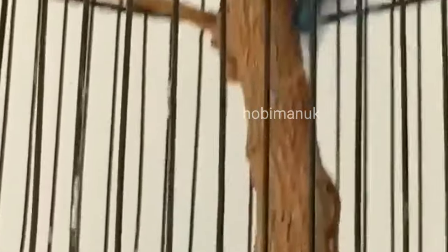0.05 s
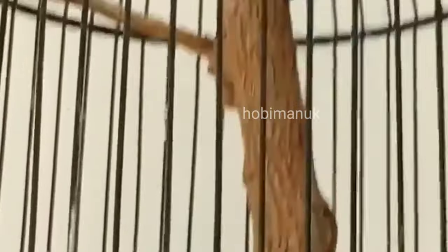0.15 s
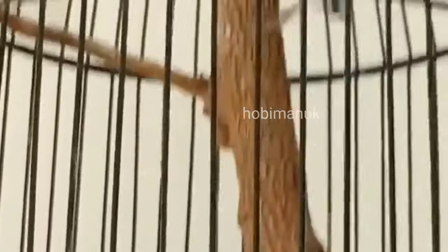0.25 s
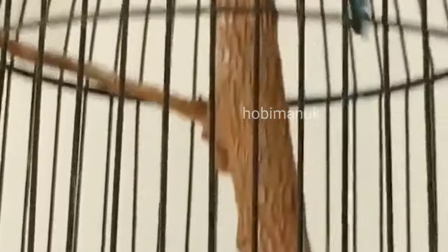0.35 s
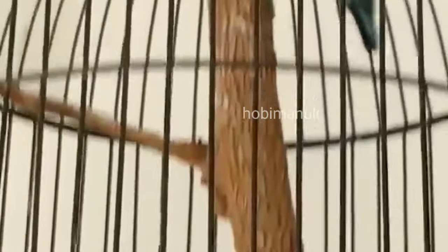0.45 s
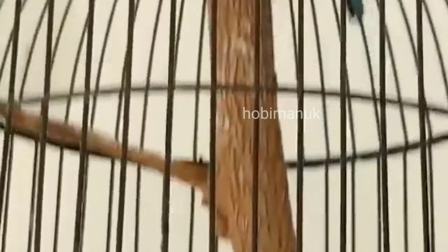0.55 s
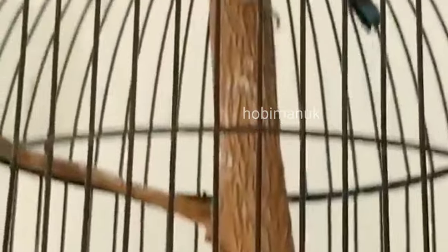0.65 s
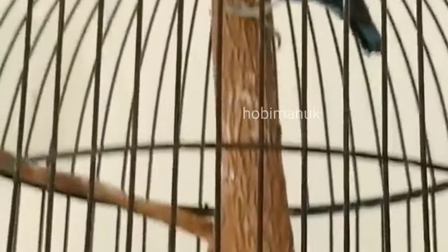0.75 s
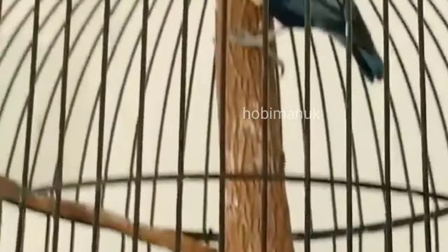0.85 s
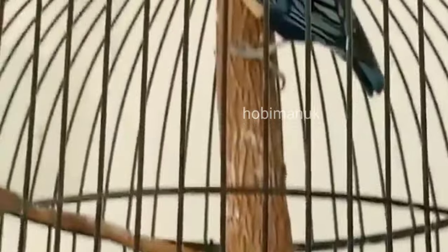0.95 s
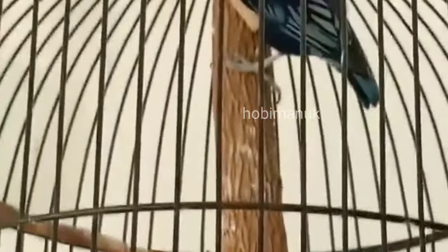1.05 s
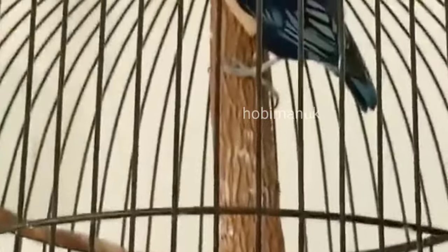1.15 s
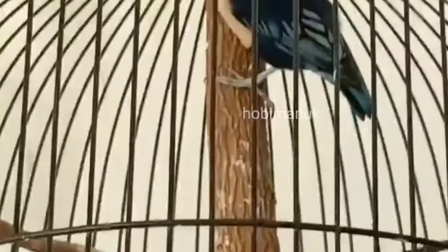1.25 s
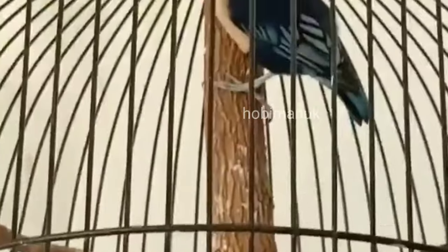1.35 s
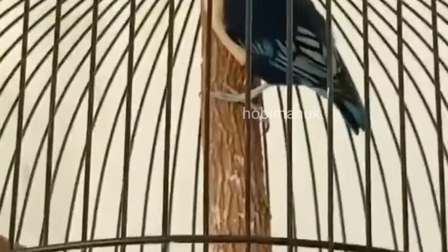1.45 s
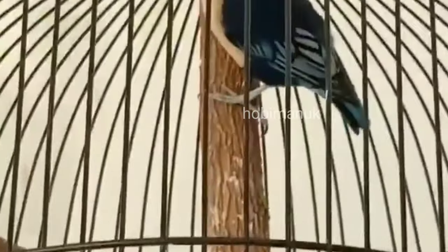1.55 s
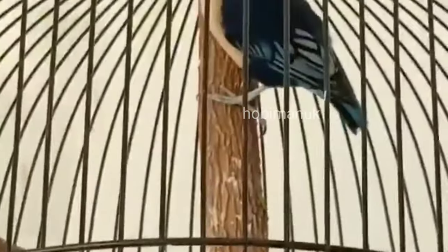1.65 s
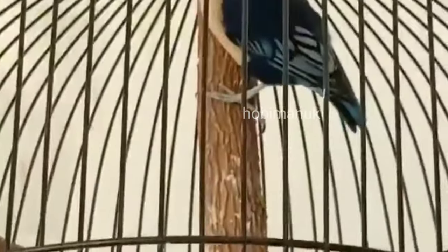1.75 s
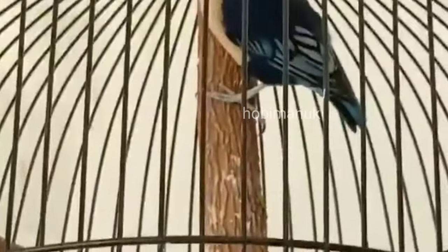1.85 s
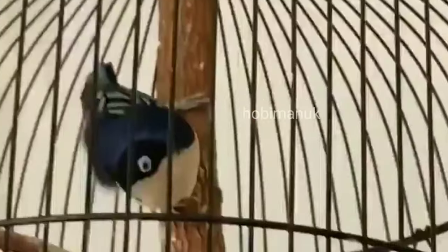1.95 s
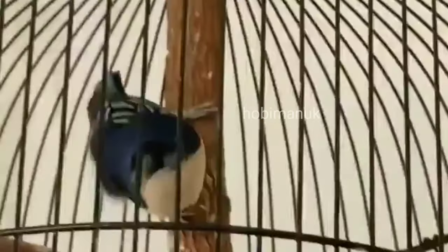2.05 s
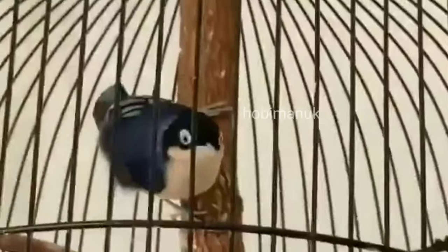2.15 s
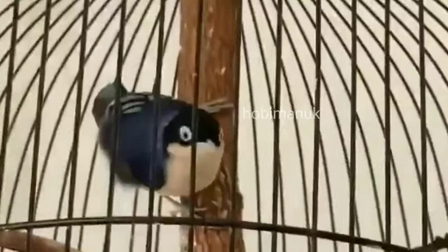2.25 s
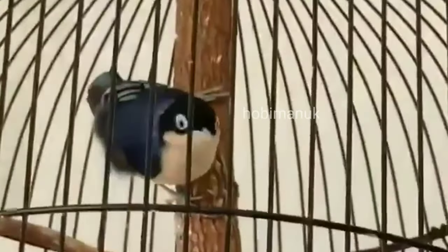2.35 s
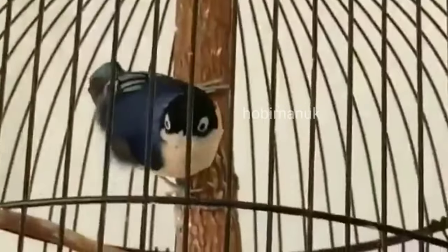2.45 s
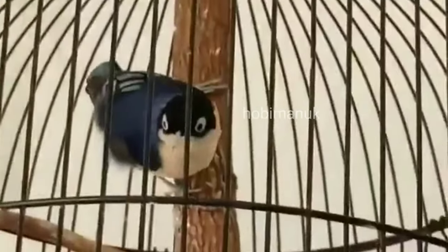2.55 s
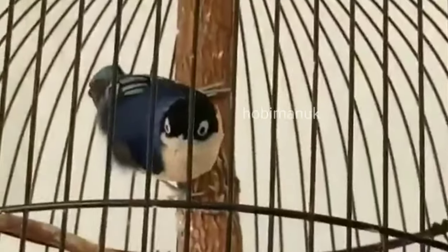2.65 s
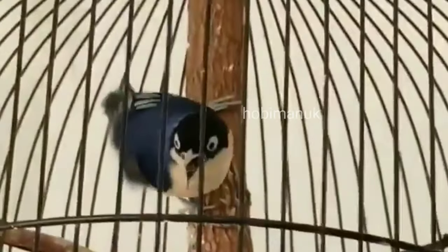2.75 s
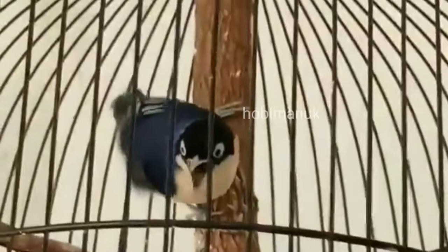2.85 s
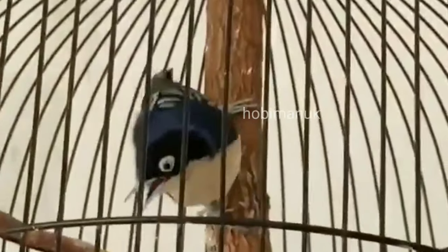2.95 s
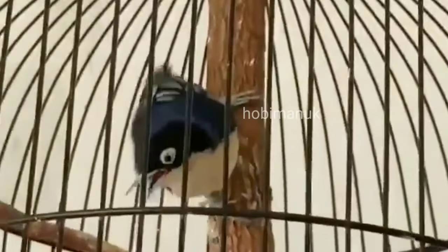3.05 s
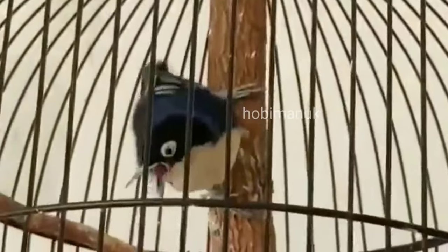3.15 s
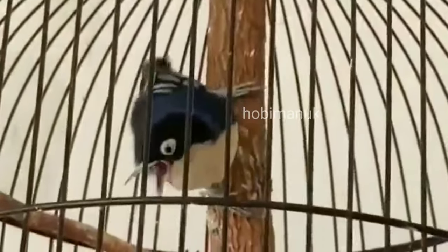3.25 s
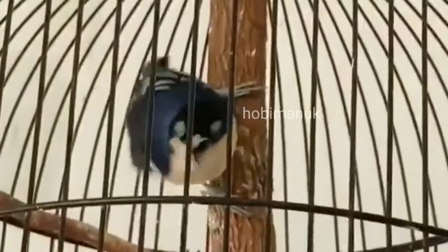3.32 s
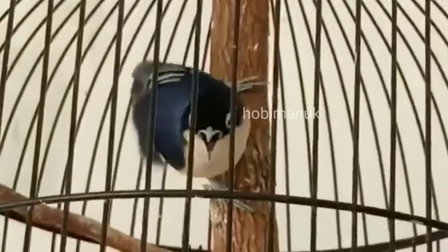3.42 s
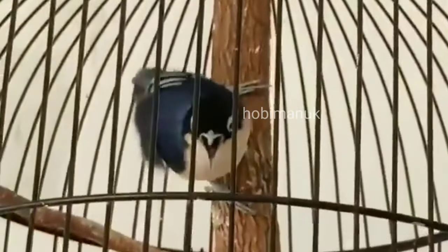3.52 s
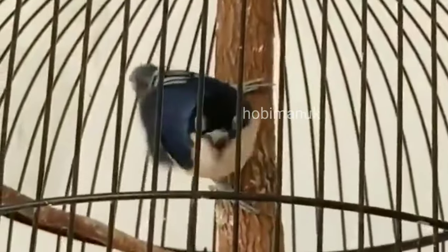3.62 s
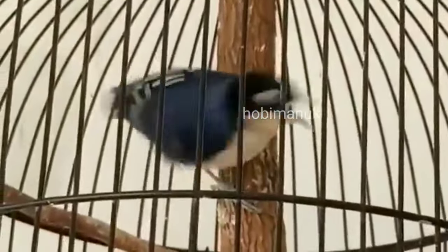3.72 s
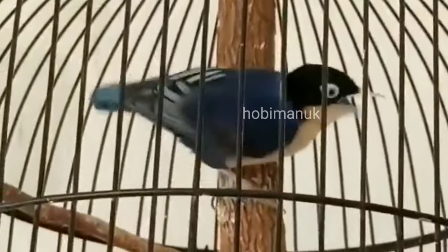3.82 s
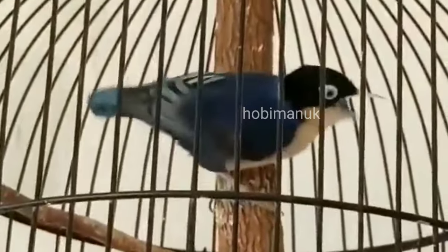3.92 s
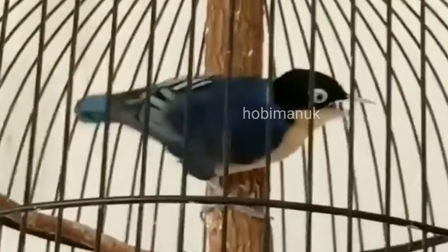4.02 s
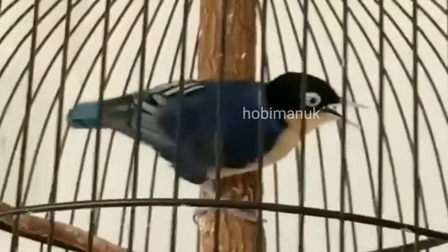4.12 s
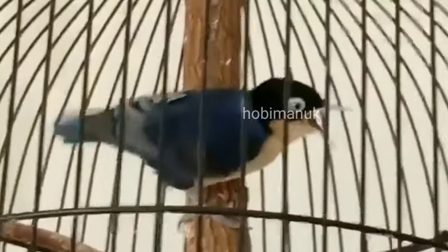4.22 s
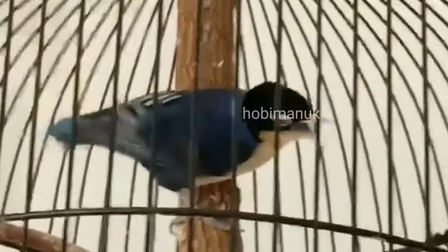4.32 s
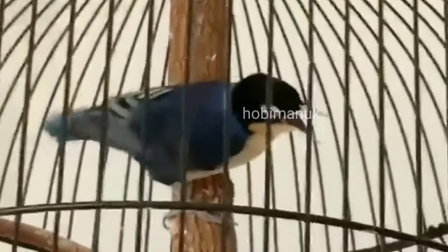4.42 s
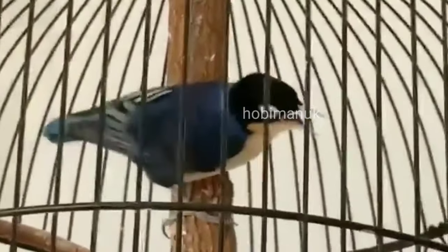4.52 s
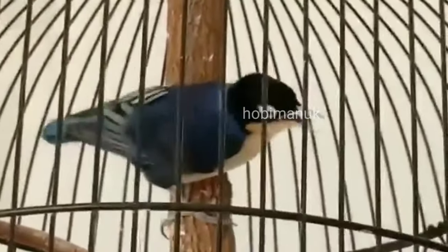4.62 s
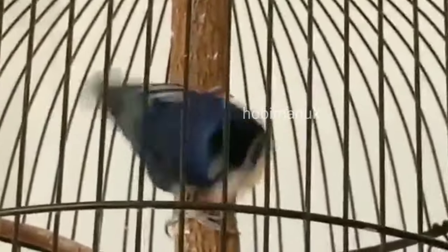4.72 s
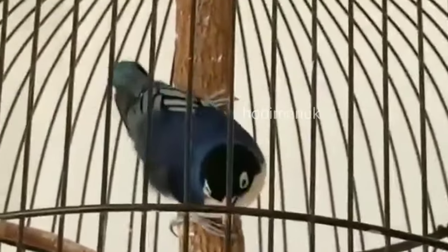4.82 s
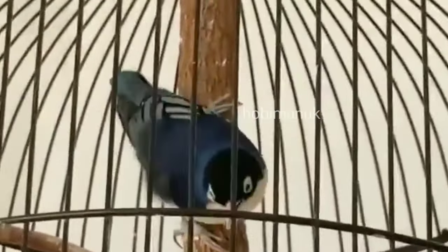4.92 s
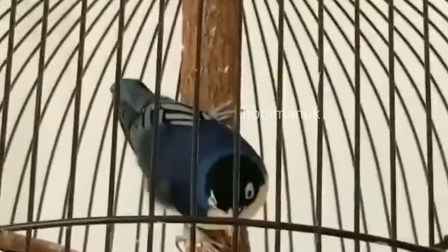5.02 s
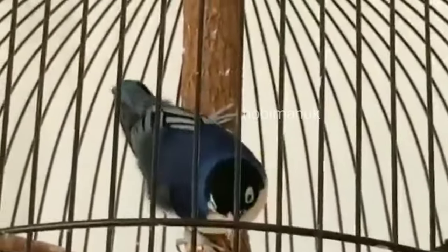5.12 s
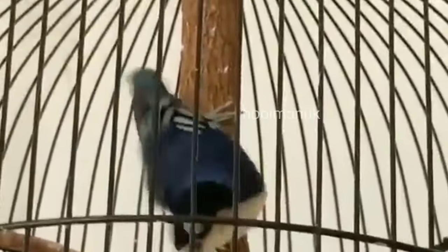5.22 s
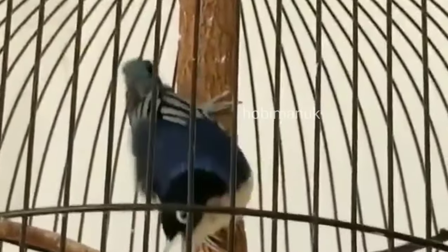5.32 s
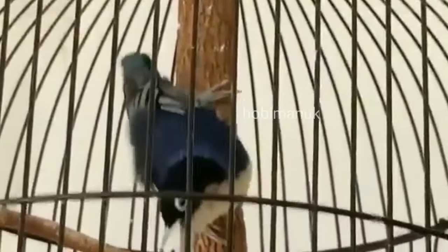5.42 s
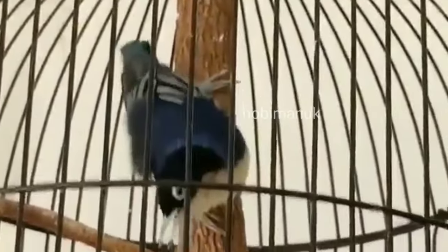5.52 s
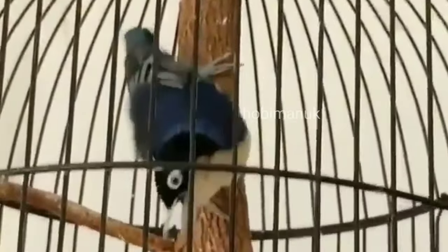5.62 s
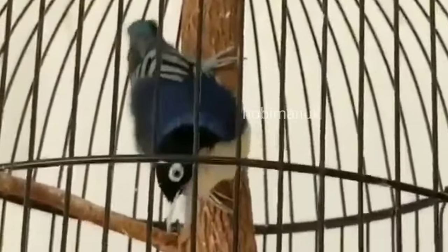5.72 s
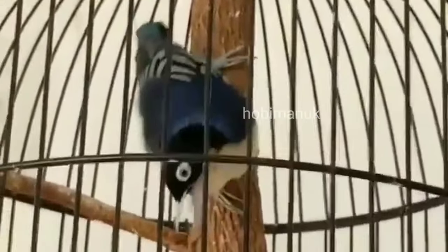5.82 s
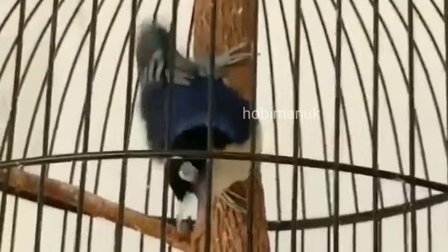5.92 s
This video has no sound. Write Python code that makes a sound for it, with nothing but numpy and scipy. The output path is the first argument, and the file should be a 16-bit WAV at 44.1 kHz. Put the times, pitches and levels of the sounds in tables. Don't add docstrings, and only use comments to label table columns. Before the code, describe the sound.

A close stereo pickup with slightly gritty, compressed treble catches a caged bird's piercing, near-pure chips, three by three, with short hard room echoes. Far hammering sounds only as reverberant thuds. After a hard cut at about two seconds, blurred chips come from another room, then a steady fast trill of about twelve notes per second runs to the end, shifting in level and side as the bird turns its head. Low drone and hiss lie underneath.

```python
import sys
import numpy as np
from scipy import signal
from scipy.fft import rfft, irfft, next_fast_len
from scipy.io import wavfile

SR = 44100
rng = np.random.default_rng(int(sys.argv[2]) if len(sys.argv) > 2 else 0)


def volts(x):
    e = np.asarray(x, float) / 20
    return 10 ** e


def transcribe(signal):
    frames = np.atleast_2d(signal).T
    limited = np.clip(frames, -1, 1)
    pcm = np.round(limited * 32767).astype(np.int16)
    wavfile.write(sys.argv[1], SR, pcm)


N = 263277
EDIT_S = 1.922

# start in seconds, peak level in dB, brightness in dB per octave,
# reach of the echo as a factor on its t60 [1].
BLOWS = [
    (0.101, -12.5, 0.8, 1.107),
    (0.63, -12, -0.33, 1.2),
    (1.162, -16, -0.02, 1.59),
    (1.687, -16.5, 0, 1.21),
    (2.955, -19, 5, 0.8),
    (3.529, -21.5, 5.5, 1.39),
    (4.628, -19.5, 4.5, 1.28),
    (5.22, -17.5, 4, 1.22),
    (5.76, -23.5, 2.5, 1.7),
]


def rms_one(x):
    return x / np.sqrt(np.mean(x ** 2) + 1e-20)


def in_time(rows):
    return np.interp(np.arange(N) / SR, *np.transpose(rows))


def at_hz(points, hz):
    table_hz, values = np.transpose(points)
    return np.interp(np.log(hz), np.log(table_hz), values)


def add(out, sound, start_s):
    start = round(start_s * SR)
    limit = round(EDIT_S * SR) if start_s < EDIT_S else N
    end = min(limit, start + sound.shape[1])
    out[:, start:end] += sound[:, :end - start]


def coloured(spectrum, size):
    # frequency in Hz, left-right likeness [0-1].
    likeness = [(30, 0.69), (200, 0.92), (500, 0.78), (1000, 0.3), (2000, 0.36), (5000, 0.05)]
    hz = np.maximum(np.fft.rfftfreq(size, 1 / SR), 1)
    mid, side = rfft(rng.standard_normal((2, size)))
    alike = np.clip(at_hz(likeness, hz), 0, 1)
    both = np.sqrt(1 + alike) * mid + np.sqrt(1 - alike) * side * [[1], [-1]]
    return both * volts(at_hz(spectrum, hz)), hz


def steady(spectrum):
    size = next_fast_len(N)
    return rms_one(irfft(coloured(spectrum, size)[0], size)[:, :N])


def chips(table, fall, peak_s, attack_db_per_s, release_db_per_s, tails, middle_hz=6297):
    # frequency in Hz, level against the chip in dB.
    overtone = [(9000, -43.5), (11500, -32), (12800, -22), (13300, -59), (13700, -52)]
    # delay in seconds, level in dB.
    wall_echoes = [(.0035, -8), (.009, -4), (.013, -11.5), (.017, -14), (.022, -14), (.03, -16)]
    # delay in seconds, level against the direct sound in dB.
    cage_echoes = [(.0006, 3.5), (.0013, -0.5), (.0022, -4)]
    lead_s, trail_s = 0.02, 0.013
    foot_db, breath_db = -25, -32.5
    direct_gain_db, room_gain_db = 12, 10.5
    note_spread, steepening = 0.08, 350
    port_lag_s = 4.5e-5
    out, t = np.zeros((2, N)), np.arange(-lead_s, trail_s, 1 / SR)

    after_s = np.arange(SR // 2) / SR
    decay = np.sqrt(sum(volts(db - 60 * after_s / t60_s) ** 2 for t60_s, db in tails))
    decay *= np.clip(after_s / 0.004, 0, 1)

    rise = volts(attack_db_per_s * (peak_s - t))
    release = 1 / (volts(release_db_per_s * (peak_s - t)) + volts(foot_db))
    envelope = signal.windows.tukey(len(t), 0.3) / (rise + release)
    airway = signal.butter(2, [3300, 13200], "band", fs=SR, output="sos")

    for middle_s, direct_db, pan_db, room_db in table:
        steep, bent = 1 + note_spread * rng.standard_normal(2) * [1, 2]
        pitch_hz = middle_hz * np.exp(-steep * fall * t - bent * steepening * t ** 2)
        phase = 2 * np.pi * np.cumsum(pitch_hz) / SR
        breath = volts(breath_db) * signal.sosfilt(airway, rng.standard_normal(len(t)))
        octave = volts(at_hz(overtone, 2 * pitch_hz)) * np.sin(2 * phase)
        note = envelope * (np.sin(phase) + octave + breath)

        echoes = decay * rng.standard_normal((2, len(after_s)))
        for delay_s, echo_db in wall_echoes:
            taps = (delay_s * SR * rng.uniform(0.9, 1.1, 2)).astype(int)
            echoes[[0, 1], taps] += volts(3.5 + echo_db) * rng.normal(0, 1, 2)
        echoes *= volts(room_db + room_gain_db)

        lag = round(port_lag_s * SR * rng.uniform(0, 2.0))
        sides_db = pan_db * np.array([0.5, -0.5]) - 0.28 * abs(pan_db)
        direct = volts(direct_db + direct_gain_db + sides_db)
        echoes[[0, 1], [0, lag]] = direct
        for delay_s, echo_db in cage_echoes:
            taps = (delay_s * SR * rng.uniform(0.7, 1.3, 2)).astype(int)
            echoes[[0, 1], taps] += direct * volts(echo_db) * rng.normal(0, 1, 2)
        add(out, signal.fftconvolve(note[None], echoes, axes=1), middle_s - lead_s)
    return out


def caged_bird():
    # time of the middle pitch in seconds, direct level in dB, left-right difference in dB,
    # room level in dB. The three trill tables have the same columns.
    groups = [
        (0.1784, -19.5, -32, -18.2),
        (0.2618, -13, 1, -17),
        (0.3493, -18.5, -2, -15.5),
        (0.8562, -11.5, 0, -15.5),
        (0.9463, -12.5, 0.5, -19.5),
        (1.0497, -14.5, 11.5, -19.5),
        (1.5568, -12, -1.5, -19),
        (1.6469, -14.5, -3.5, -19),
        (1.7467, -14, 3, -20.5),
    ]
    trill_down = [(2.812, -11.5, 2.4, -19.5), (2.8837, -14.5, 1.4, -18), (2.9654, -13, 1.5, -17.5),
                  (3.0481, -12.5, 4.2, -18.3), (3.1321, -16.5, 8.4, -18), (3.2119, -15, 16, -18.5),
                  (3.2932, -17.5, 5.7, -20.5), (3.373, -17, 11, -19), (3.4567, -13.5, 1.1, -18),
                  (3.535, -16.5, 6.5, -21), (3.6176, -15.5, 9.6, -18), (3.6978, -17.5, 1.25, -19),
                  (3.7772, -14.5, 1.4, -18)]
    trill_side = [
        (3.8622, -19.5, -3, -22.5),
        (3.9433, -26, -21, -20),
        (4.0297, -22.5, 2, -20),
        (4.1145, -24, -19, -18.5),
        (4.2004, -23, -15, -18.0),
        (4.2876, -11.5, -3.4, -18),
        (4.3755, -16, -4, -19.4),
        (4.4592, -15.5, 1, -19.5),
        (4.5457, -18, 9, -19),
        (4.6302, -18.5, -11.3, -17.0),
    ]
    trill_end = [(4.7207, -15.3, 4.5, -16), (4.8086, -11, -4, -13.5), (4.9027, -18, 11, -18.5),
                 (4.9888, -14, 0, -15), (5.0836, -21, 0, -15.5), (5.1772, -14.5, 4, -14.9),
                 (5.271, -24, 11, -14.5), (5.3606, -15.5, 2.5, -17.5), (5.4545, -14.5, 0.5, -18.5),
                 (5.5485, -13.5, -2.2, -18), (5.6457, -16, 3, -18), (5.7459, -17, 0, -20),
                 (5.843, -16, 4.5, -18), (5.9387, -13, -6, -21)]
    # t60 in seconds, level in dB.
    room_tails = [(0.079, -18.5), (0.252, -22.5), (0.901, -43)]
    return (chips(groups, 25.5, 0.0027, 3820, 4200, room_tails)
            + chips(trill_down, 25.8, 0.0016, 3270, 5650, room_tails)
            + chips(trill_side, 25.7, 0.0023, 2290, 4230, room_tails)
            + chips(trill_end, 27.7, 0.0023, 3260, 4680, room_tails))


def hammer():
    # frequency in Hz, level in dB per Hz.
    blow_body = [(59, -44), (100, -11.5), (125, -34.5), (177, -6), (330, -6.5), (516, -6), (586, -5),
                 (1010, -11), (1820, -17.5), (2130, -15.5), (4500, -18.5), (5850, -49), (9900, -120)]
    # frequency in Hz, level in dB per Hz.
    blow_treble = [(6000, -25), (7500, -35.5), (9000, -44)]
    # frequency in Hz, t60 in seconds.
    blow_t60 = [(100, 0.56), (500, 0.59), (2000, 0.72), (7000, 1)]
    later_step_db, later_edge_hz = -12, 3000
    out, t = np.zeros((2, N)), np.arange(SR) / SR
    colour = [row for row in blow_body if row[0] < 5e3] + blow_treble
    centres_hz = 100 * 2. ** np.arange(8)
    for start_s, peak_db, tilt_db, reach in BLOWS:
        noise, hz = coloured(colour, SR)
        noise = noise * volts(tilt_db * np.log2(np.maximum(hz, 300) / 600))
        if start_s > EDIT_S:
            noise = noise * volts(later_step_db * np.clip(4 * np.log2(hz / later_edge_hz), 0, 1))
        scale = np.sqrt(np.mean(irfft(noise) ** 2))
        blow = 0
        for centre_hz in centres_hz:
            share = np.clip(1 - np.abs(np.log2(hz / centre_hz)), 0, 1)
            late = volts(-60 * t / (reach * at_hz(blow_t60, centre_hz)))
            early = 0.5 * volts(-60 * t / 0.15)
            blow = blow + irfft(noise * share) * (late + early)
        swell = np.clip(t / 0.015, 0, 1)
        add(out, blow / scale * volts(peak_db - 9.5) * swell, start_s - 0.006)
    return out


def far_bird():
    # time of the middle pitch in seconds, peak level in dB.
    far_chips = [
        (2.169, -41),
        (2.2577, -35.5),
        (2.354, -33),
        (2.449, -30.5),
        (2.5444, -33),
        (2.6488, -55),
        (2.7167, -43),
    ]
    doorway_hz = [4750, 6350]
    rows = [(s, -70, 0, db - 4.5) for s, db in far_chips]
    echoes = chips(rows, 32, 0.0021, 830, 900, [(0.2, -26), (0.8, -27)], 5610)
    return signal.sosfilt(signal.butter(5, doorway_hz, "band", fs=SR, output="sos"), echoes)


def hoarse_calls():
    # start in seconds, length in seconds, start pitch in Hz, level in dB.
    calls = [
        (1.07, .1, 2500, -34),
        (1.85, .07, 3500, -43),
        (3.29, .13, 2450, -35),
        (3.37, .14, 3200, -37),
        (3.55, .1, 3600, -40),
    ]
    rise, width_hz, breaks_db = 1.12, 330, 4.0
    out, t = np.zeros((2, N)), np.arange(SR // 2) / SR
    slow = signal.butter(2, width_hz, fs=SR, output="sos")
    for start_s, length_s, start_hz, db in calls:
        pitch_hz = np.interp(t, [0, length_s], [start_hz, start_hz * rise])
        breath = signal.sosfilt(slow, rng.standard_normal((2, len(t))))
        envelope = np.clip(t / 0.025, 0, 1) * volts(db - 250 * np.maximum(t - length_s, 0))
        envelope *= volts(breaks_db * np.interp(t * 50, np.arange(26), rng.standard_normal(26)))
        carrier = np.sin(2 * np.pi * np.cumsum(pitch_hz) / SR)
        add(out, envelope * rms_one(breath) * carrier, start_s)
    return out


def room_tone():
    # time in seconds, gain in dB.
    gain_rows = [(0, -10.5), (1.92, -8.5), (1.93, -50), (2.1, -16), (2.28, -1.5), (2.55, -0.5), (2.8, -0.5),
                 (2.84, -11.5), (2.95, -8), (3.8, -11.5), (4.6, -4), (5.6, -12), (5.97, -7.5)]
    # frequency in Hz, level in dB per Hz; so too the four below.
    air_body = [(71, -22), (120, -11), (178, -1.5), (326, -10.5), (442, -4.5), (862, -9.5), (2340, -10),
                (4050, -16), (4500, -17.5), (5850, -71.5), (9900, -120)]
    air_treble = [(5500, -12.5), (7500, -42), (9000, -75), (12000, -52), (15000, -41), (16000, -91)]
    drone_colour = [(90, -36), (140, -9), (175, 15.5), (240, 4.5), (330, 8), (450, -70)]
    rumble_colour = [(15, -37), (25, -8), (32, -37), (65, -7), (108, -20.5), (130, -15), (170, -27),
                     (290, -120)]
    hiss_colour = [(150, -11), (1000, -29.5), (4000, -1.5), (7500, -16), (9000, -10.5), (12000, -11),
                   (15000, -16), (16000, -59)]
    t = np.arange(N) / SR
    gain_db = in_time(gain_rows)
    lumps_db = 3.5 * np.interp(t * 10, np.arange(61), rng.standard_normal(61))
    rumble_db = np.maximum(-50.5 + 1.42 * gain_db, -61) + lumps_db
    for start_s, *_ in BLOWS:
        since_s = t - start_s
        rumble_db += 10 * (since_s > 0) * np.exp(-np.abs(since_s) / 0.079)
    air_colour = [row for row in air_body if row[0] < 4.6e3] + air_treble
    air = volts(-41.5 + gain_db) * steady(air_colour)
    drone = volts(-42.5 + 4.16 * gain_db) * steady(drone_colour)
    rumble = volts(rumble_db) * steady(rumble_colour)
    hiss = volts(-48.5 + 0.24 * gain_db) * steady(hiss_colour)
    return air + drone + rumble + hiss


def scene():
    return caged_bird() + hammer() + far_bird() + hoarse_calls() + room_tone()


def thin_out(x):
    # frequency in Hz, threshold against the band's usual level in dB.
    dropout = [(1200, -22), (2600, -12), (3500, -3), (4400, -9), (4800, -60), (6300, -60), (7000, -7),
               (7800, 1), (9500, 3), (11000, -2), (13000, -6), (13500, 5), (15000, 3)]
    hz, _, spectra = signal.stft(x, SR, nperseg=1024)
    power = np.abs(spectra) ** 2
    band_edges = np.round(np.geomspace(28, 370, 40)).astype(int)
    loudest_db = 10 * np.log10(power.max(axis=(0, 1)) + 1e-14)
    excess_db = loudest_db - np.median(loudest_db)
    for low, high in zip(band_edges, band_edges[1:]):
        band = power[:, low:high].mean(axis=1, keepdims=True)
        band_db = 10 * np.log10(band.mean(axis=(0, 1)) + 1e-14)
        whim_db = 4.5 * np.repeat(rng.standard_normal(len(band_db)), 4)[:len(band_db)]
        bar_db = np.median(band_db) + at_hz(dropout, hz[low]) + 0.45 * excess_db + whim_db
        line_share = 0.3 if 4400 < hz[low] < 7000 else 0.7
        strong_lines = power[:, low:high] > line_share * band
        spectra[:, low:high] *= (band_db > bar_db) * strong_lines
    return signal.istft(spectra, SR, nperseg=1024)[1][:, :N]


def low_pass(x):
    return signal.sosfilt(signal.butter(12, 15500, fs=SR, output="sos"), x)


def record(dry):
    blip_gain, bend, ceiling = 0.2, 0.012, 1.15
    blip_band = signal.butter(2, [270, 2800], "band", fs=SR, output="sos")
    squared = dry ** 2
    blip = signal.sosfilt(blip_band, (squared + np.mean(squared, axis=0)) / 2)
    bent = dry + blip_gain * blip + bend * squared
    rounded = ceiling * np.tanh(bent / ceiling)
    cut = signal.sosfilt(signal.cheby2(10, 50, 15500, fs=SR, output="sos"), rounded)
    mix = np.clip(thin_out(cut), -1, 1)
    return low_pass(mix)


dry = scene()
out = record(dry)
transcribe(out)
```